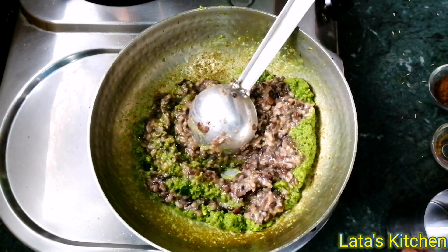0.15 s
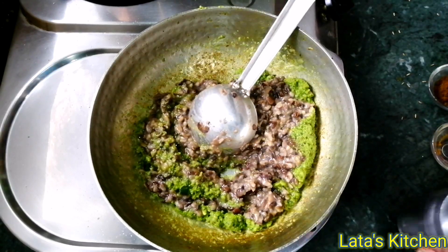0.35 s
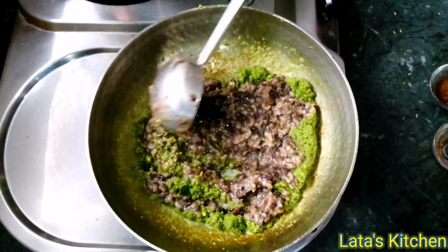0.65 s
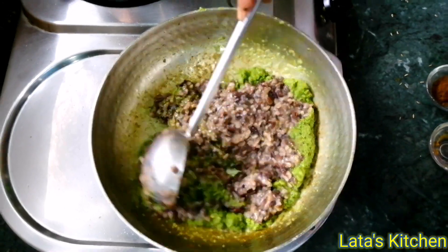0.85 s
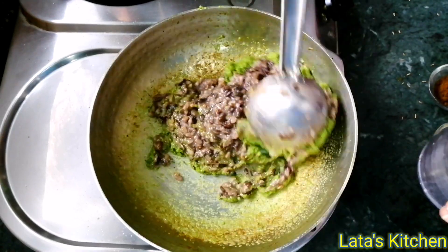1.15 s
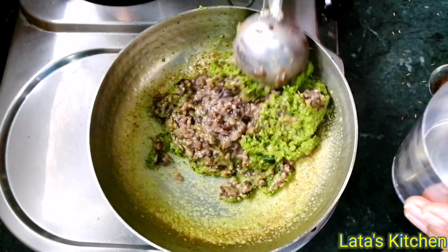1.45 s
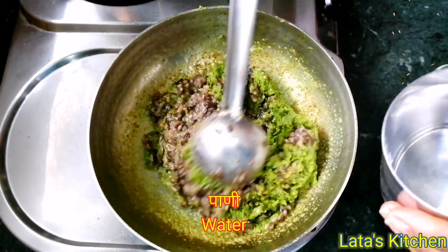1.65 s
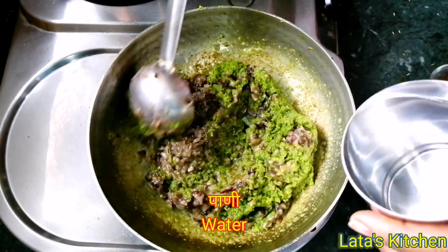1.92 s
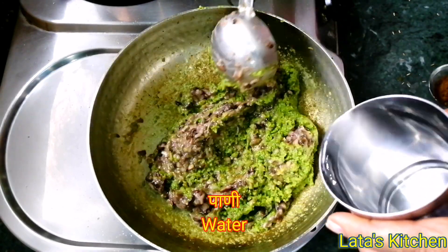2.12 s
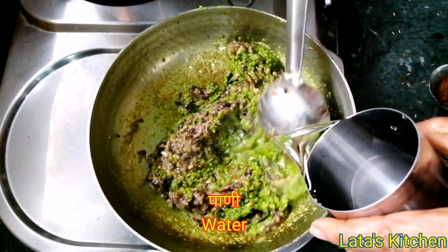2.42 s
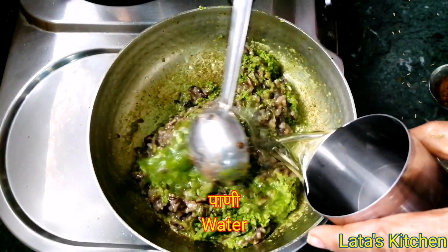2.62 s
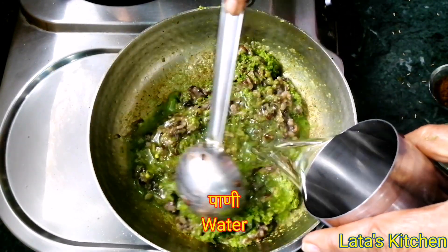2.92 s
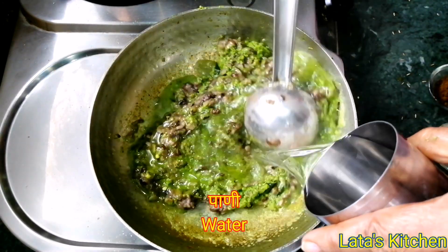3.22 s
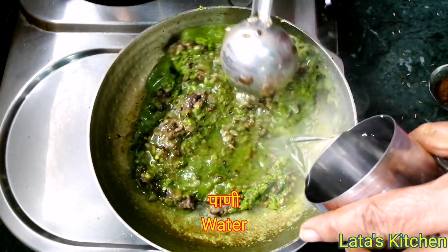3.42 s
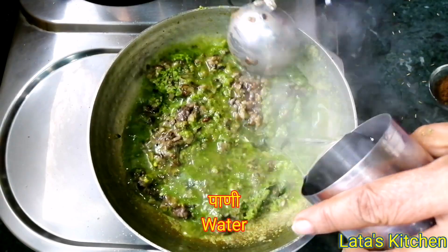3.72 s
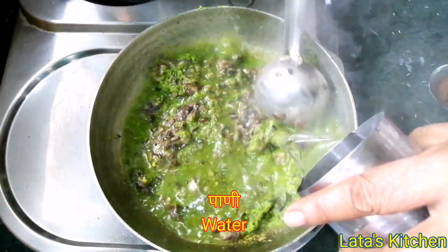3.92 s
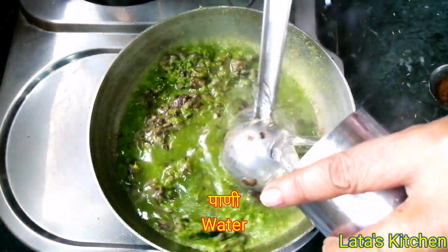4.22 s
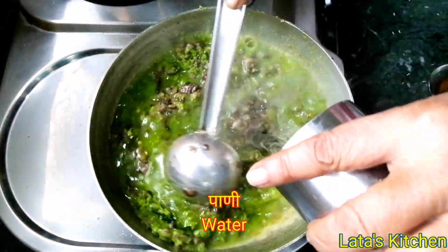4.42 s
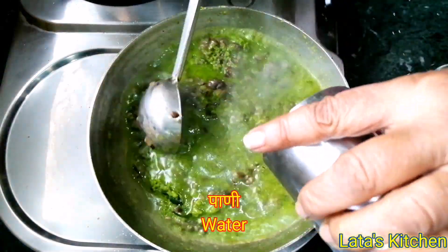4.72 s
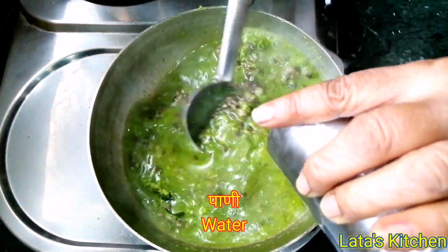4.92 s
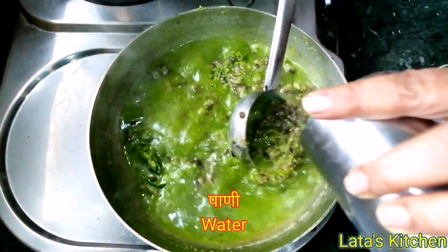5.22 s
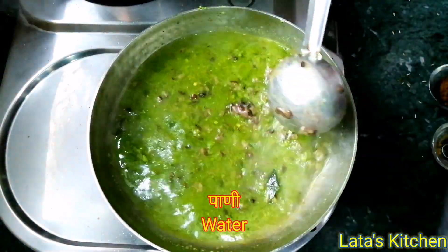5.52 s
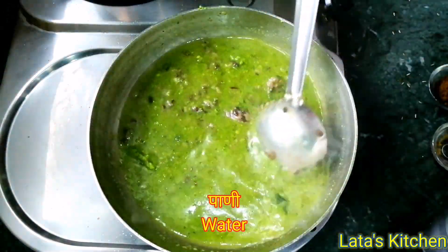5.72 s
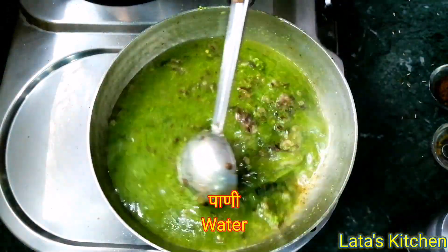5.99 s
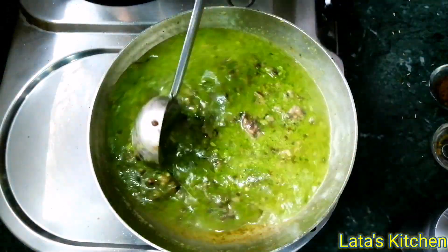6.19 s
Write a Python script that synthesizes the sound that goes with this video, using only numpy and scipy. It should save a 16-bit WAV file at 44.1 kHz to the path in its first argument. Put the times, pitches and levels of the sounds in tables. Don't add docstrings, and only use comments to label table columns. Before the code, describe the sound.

Stereo microphones close over the stove catch crisp, crackling sizzle already under way, thick with oil pops. The sizzle dips and flares as a ladle scrapes and thumps through the food and the pan rocks. Added water brings sharp swells of hiss, one brief bright clang on the rim, fluttering steam puffs, then softer bubbling surges with few pops. Low house and flame rumble stays underneath, the room small and fairly dry.

```python
import sys
import numpy as np
from scipy import signal
from scipy.fft import rfft, irfft
from scipy.io import wavfile

SR = 44100
rng = np.random.default_rng(int(sys.argv[2]) if len(sys.argv) > 2 else 0)


def store_pcm(level_fs):
    pcm = np.round(np.clip(level_fs, -1, 1) * 32767).astype(np.int16)
    wavfile.write(sys.argv[1], SR, np.atleast_2d(pcm).T)


def level_to_linear(level):
    exponent = np.asarray(level, float) / 20
    return 10 ** exponent


N = 280023

# t/s, throb level/dB, drone level/dB, drone f/Hz
HOUSE = [
    (0, -53, -53.5, 160),
    (.7, -55, -57, 164),
    (1.0, -53, -56.5, 140),
    (1.35, -52, -72, 137),
    (1.7, -63, -62, 145),
    (2.3, -51, -64, 140),
    (2.8, -67, -60.5, 146),
    (3.4, -68, -58.5, 138),
    (4.3, -57.5, -66.5, 145),
    (6.35, -56.5, -60.5, 141),
]
# f/Hz, level/dB per Hz
AIR_SPECTRUM = [(15, -3), (30, -21), (45, -31), (60, 4.5), (75, -7), (110, 2), (170, -7), (210, -13.5),
                (400, -27.5), (900, -8.5), (3000, -28.5)]
# t/s (full strength), level/dB, rise/(dB/s), hold/s, fall/(dB/s)
FLARES = [(0, -33, 50, 0.41, 27), (.46, -40.5, 30, 0.041, 57), (.8, -36, 32, 0.2, 21),
          (1.16, -25.5, 54, 0.055, 22.5), (1.56, -30, 30, 0.078, 28), (1.9, -37.5, 30, .1, 30),
          (2.07, -28.5, 72, 0.15, 17), (2.42, -31.5, 24, 0.12, 40), (2.635, -25, 255, 0.039, 20),
          (2.76, -26.5, 40, 0.047, 24), (2.95, -31, 11, 0.13, 40), (3.155, -23, 300, 0.042, 29),
          (3.3, -19.5, 69, 0.44, 39), (4.02, -32.5, 30, 0.14, 30), (4.28, -25, 39, .22, 36),
          (4.62, -34.5, 41, 0.23, 25), (5.22, -25.5, 126, 0.038, 45.5), (5.55, -38.5, 31, .13, 60),
          (5.95, -32.5, 168, 0.15, 27), (6.3, -30.5, 108, .1, 21)]
# t/s, brightness of bare metal/dB, standing water/(0 to 1)
PAN_FLOOR = [(0, 17, 0.5), (.5, 1.5, 0.36), (.9, 3, 0.6), (1.15, 2, 0.03), (1.43, 12, 0.08), (1.7, 6, 0.14),
             (2.15, 12.5, 0.29), (2.65, 4.5, 0.23), (3.15, 2.5, 0.24), (3.6, 3.5, 0.59), (4.0, -2.5, 1.0),
             (4.45, 8, 0.49), (4.7, 2, .8), (5.25, 1, .7), (5.55, 1, 0.33), (5.95, -4, 0.4),
             (6.15, 3, 0.54), (6.35, 2, 0.85)]
# t/s, level/dB against the fizz
CRACKLE = [
    (0, -7),
    (.6, -3.5),
    (.9, -10.5),
    (2.4, -3.5),
    (2.7, -16),
    (3.1, -13),
    (4, -24),
    (4.4, -30),
    (5.2, -29),
    (6.35, -20.5),
]
# t/s, level/dB against the fizz, length/s
PUFFS = [(3.153, -2, 0.012), (3.19, -15, 0.0075), (3.22, 1, 0.0095), (3.315, 1, 0.016), (4.256, 7, 0.0063),
         (4.285, -1, 0.011), (4.331, 9, .005), (4.357, 5.5, 0.0072), (4.381, 5, .006), (4.416, 5.5, .008),
         (4.451, 5.5, 0.018), (4.478, 5, 0.0096), (4.497, 6, 0.0053), (4.518, 5, .008), (6.237, 3, 0.0088)]
# f/Hz, level/dB per Hz
FIZZ_SPECTRUM = [(1500, -10), (2500, -1.5), (3500, 4.5), (5000, 4), (9000, -0.5), (12000, -2.5),
                 (16000, -10)]
BOIL_SPECTRUM = [(200, -36.5), (450, -9.5), (800, -3), (1200, -2.5), (1700, 3.5), (2500, -0.5),
                 (3500, -8.5), (6000, -58)]
# f/Hz, width/Hz, level/dB
BOWL_MODES = [(890, 123, 3.5), (1720, 53, 2)]
# t/s, peak level/dB, left over right/dB
SPITS = [(0.0302, -28, 2), (0.0761, -13, -15), (0.112, -7.5, -7), (0.129, -11, -4), (0.161, -15, -2.5),
         (0.1674, -16, -0.5), (0.1864, -21, 2.5), (0.1919, 2, -4), (0.2064, -20, 19), (0.2164, -14, 0.5),
         (0.2348, -11, -2), (0.2497, -7, -8), (0.2871, -12, -9), (0.305, -5, 11.5), (0.3515, -18, 3),
         (0.3994, -18, 1.0), (0.4208, -27, 1.5), (0.4214, -5.5, 2), (0.4503, -13, 1.0), (0.4574, -8, 5),
         (0.4814, -13, 1.0), (0.5042, -13, 3.5), (0.5164, -10, 5), (0.561, -8, 7), (0.7411, -9, 1),
         (0.935, -10, -8), (1.045, -13, -0.5), (1.1417, -16, -7), (1.9618, -10, -7), (2.0564, -4, -14)]
# t/s, hum level/dB, hold/s, fall/(dB/s)
ROCKS = [(.09, -58, .02, 90), (.28, -57, .02, 90), (0.487, -48.5, 0.07, 200), (.99, -49, .01, 200),
         (1.15, -46.5, 0.13, 200), (1.656, -52.5, 0.018, 72), (2.15, -58, .02, 66), (2.436, -53, .03, 60.5),
         (2.78, -57, .02, 102), (3.24, -45.5, .05, 60), (3.77, -40, 0.14, 225), (4.067, -46.5, 0.11, 90),
         (4.42, -41.5, .08, 60), (5.03, -56.5, 0.045, 25), (5.802, -47.5, 0.17, 220),
         (6.063, -45, 0.065, 122)]
# t/s, rumble level/dB
DRAGS = [(.48, -44), (.85, -49), (.99, -40.5), (1.11, -40), (1.66, -44.5), (2.41, -48), (3.2, -48),
         (3.48, -48), (3.74, -35), (3.9, -47), (4.1, -44.5), (4.45, -43.5), (5.8, -47), (5.99, -53)]
# t/s, peak level/dB, f/Hz, t60/s
KNOCKS = [(0.464, -46.5, 288, 0.042), (.464, -53, 523, 0.033), (.62, -63.5, 533, 0.56),
          (0.906, -49, 2010, 0.18), (.972, -33, 2150, 0.0075), (1.0, -53, 280, 0.087),
          (1.023, -38, 1680, 0.02), (1.024, -36, 755, 0.014), (1.141, -55, 300, .08),
          (1.652, -52, 280, .07), (3.828, -22, 1360, 0.0076), (3.833, -29, 1250, 0.0065),
          (3.838, -18, 1310, 0.0096)]
# t/s, strength level/dB
RIM_SKIPS = [
    (3.6952, -13),
    (3.6985, -10),
    (3.7092, -3),
    (3.7128, -6),
    (3.7148, -5),
    (3.7178, -5),
    (3.7235, -6),
    (3.7265, -8),
    (3.733, -11),
]
LADLE_HZ = [1751, 2257, 2925, 4420, 5217, 6113, 7075, 7084, 7644, 8120, 9214, 9605, 10018, 10405, 10468,
            11620, 12388, 12975, 13193, 14100, 15078]
# left level/dB, right level/dB, swell/s, t60/s
LADLE_MODES = [(-12.5, -17.5, .035, .35), (-28, -28, .003, .12), (-38, -38, .01, .2), (-41, -38, .005, .2),
               (-22, -18, .02, .45), (-32, -35, .01, .5), (-33, -22, .008, .7), (-36, -31, .01, .7),
               (-31, -35, .005, .4), (-40, -42, .005, .5), (-20, -21, .004, .2), (-29, -28, .01, .3),
               (-27, -29, .01, .3), (-22, -29, .015, .3), (-26, -28, .01, .3), (-34, -26, .005, .3),
               (-22, -22, .008, .3), (-31, -25, .01, .35), (-26, -24, .005, .25), (-33, -23, .006, .25),
               (-39, -34, .03, .3)]
# f/Hz, width/Hz, level/dB
PORTS = [
    [(7895, 3150, 16.5)],
    [(6114, 1530, 12.5), (8060, 4000, 2.5), (15030, 1260, 12.5)],
]


def rms_one(x):
    return x / np.sqrt(np.mean(x ** 2) + 1e-20)


def in_time(rows):
    s, *columns = np.transpose(rows)
    return [np.interp(np.arange(N) / SR, s, column) for column in columns]


def sides(pan_db):
    return level_to_linear(np.array([pan_db / 2, -pan_db / 2]))


def band(x, low_hz, high_hz):
    return signal.sosfilt(signal.butter(2, [low_hz, high_hz], "band", fs=SR, output="sos"), x)


def colour(x, points, size=8192):
    hz, db = np.transpose(points)
    bins_hz = np.arange(size // 2 + 1) * SR / size + 1
    cepstrum = irfft(np.log(level_to_linear(np.interp(np.log(bins_hz), np.log(hz), db))))
    cepstrum[1:size // 2] *= 2
    cepstrum[size // 2 + 1:] = 0
    response = irfft(np.exp(rfft(cepstrum)))
    return signal.oaconvolve(np.atleast_2d(x), response[None], axes=1)[:, :N]


def peaks(x, rows):
    for hz, width_hz, db in rows:
        g, w, half = level_to_linear(db / 2), 2 * np.pi * hz / SR, np.pi * width_hz / SR
        middle = -2 * np.cos(w)
        x = signal.lfilter([1 + half * g, middle, 1 - half * g], [1 + half / g, middle, 1 - half / g], x)
    return x


def drift(rate_hz):
    r = np.exp(-80 * np.pi * rate_hz / SR)
    slow = signal.lfilter([1], [1, -2 * r, r * r], rng.standard_normal(N // 40 + 2002))[2000:]
    return np.interp(np.arange(N) / 40, np.arange(len(slow)), rms_one(slow))


def swells(rows, rest_db):
    t = np.arange(0, N + 64, 64) / SR
    power = level_to_linear(2 * rest_db)
    for s, db, rise, hold, fall in rows:
        rising_db = rise * np.maximum(s - t, 0)
        falling_db = max(fall, 16) * np.maximum(t - s - hold, 0)
        power = power + level_to_linear(2 * (db - rising_db - falling_db))
    return np.interp(np.arange(N) / SR, t, 10 * np.log10(power))


def bursts(per_s, spread_db, patchy_db, count=10):
    wall_db, wall_fall_db, size = -2, .12, 256
    out, together = np.zeros((2, N)), drift(27)
    for spot in range(count):
        born = rng.random(N) < per_s / count / SR
        sizes = level_to_linear(spread_db * np.minimum(rng.exponential(1, N), 4)) * rng.choice([-1, 1], N)
        flicker = level_to_linear(patchy_db * (0.33 * together + drift(18.6)))
        walls = level_to_linear(wall_db - wall_fall_db * np.arange(size)) * rng.standard_normal((2, size))
        walls *= rng.random((2, size)) < .08
        walls[:, :14] = 0
        paths = signal.lfilter([.7, -.7], [1, -.7], walls)
        paths[0, 2] = paths[1, 2 + spot] = 1
        out += signal.oaconvolve((born * sizes * flicker)[None], paths, axes=1)[:, :N]
    return out


def air():
    deep_db, drone_db, drone_hz = in_time(HOUSE)
    noise = rng.standard_normal(N) + 0.27 * rng.standard_normal((2, N))
    deep = band(noise, 26, 40)
    drone_phase = 2 * np.pi * np.cumsum(drone_hz + 8 * drift(6)) / SR
    drone = np.sqrt(2) * (1 + 0.51 * drift(10.7)) * np.sin(drone_phase)
    rumble = level_to_linear(-51.5) * rms_one(colour(noise, AIR_SPECTRUM))
    return rumble + level_to_linear(deep_db + 1) * rms_one(deep) + level_to_linear(drone_db) * drone


def steam_puffs():
    t = np.arange(N) / SR
    envelope = sum(level_to_linear(db + 0.5) * np.exp(-((t - s) / length) ** 2) for s, db, length in PUFFS)
    return envelope * band(rng.standard_normal((2, N)), 6100, 9200)


def fizz(level_db, bright_db):
    dense = rms_one(bursts(8000, spread_db=2.5, patchy_db=2.2))
    lone = rms_one(band(bursts(260, spread_db=2.5, patchy_db=12.5), 5000, 15000))
    pops = level_to_linear(in_time(CRACKLE)[0] - 3.5) * lone
    whole = rms_one(colour(dense + pops + steam_puffs(), FIZZ_SPECTRUM))
    hiss = rms_one(colour(rng.standard_normal((2, N)), FIZZ_SPECTRUM))
    high = signal.butter(1, 9500, "high", fs=SR, output="sos")
    top, fine = signal.sosfilt(high, whole), signal.sosfilt(high, hiss)
    return level_to_linear(level_db - 8.0) * (whole - top + level_to_linear(bright_db) * (1.075 * top + 0.83 * fine))


def boil(level_db):
    pockets = bursts(2500, spread_db=1.0, patchy_db=2.0)
    return level_to_linear(level_db) * rms_one(peaks(colour(pockets, BOIL_SPECTRUM), BOWL_MODES))


def spits():
    echo_db, top_db, size = -12, -0.5, 300
    big_db, dull_per_db = -9.5, 9
    out, rows = np.zeros((2, N)), np.array(SPITS)
    shape = (len(rows), 2, size)
    scatter = rng.standard_normal(shape) * (rng.random(shape) < .09)
    for (s, peak_db, pan_db), walls in zip(rows, scatter):
        dull_db = dull_per_db * max(peak_db - big_db, 0)
        shot = walls * level_to_linear(-5.0 - 0.14 * np.arange(size))
        shot[:, 0] = 1
        shot[1, 26] = level_to_linear(echo_db - dull_db)
        sound = band(shot, 5700, 9700) + level_to_linear(top_db - dull_db) * band(shot, 10000, 19000)
        at = round((s + .0015) * SR)
        out[:, at:at + size] += level_to_linear(peak_db) * sides(pan_db)[:, None] * sound
    return out


def stove():
    rocks = [(s, db, 250, hold, fall) for s, db, hold, fall in ROCKS]
    drags = [(s, db, 200, 0.014, 124) for s, db in DRAGS]
    sheet_db, drag_db = swells(rocks, rest_db=-83), swells(drags, rest_db=-55.5)
    sheet_hz = 94.5 + 1.21 * drift(1.6)
    sheet = np.sqrt(2) * level_to_linear(sheet_db) * np.sin(2 * np.pi * np.cumsum(sheet_hz) / SR)
    same, own = rng.standard_normal(N), rng.standard_normal((2, N))
    drag = band(same + .5 * own, 170, 480)
    return sheet + level_to_linear(drag_db - 9.0) * rms_one(drag)


def knocks():
    out, t = np.zeros(N), np.arange(8000) / SR
    for s, peak_db, hz, t60 in KNOCKS:
        envelope = level_to_linear(peak_db + 9.0 - 60 * t / t60) * (1 - np.exp(-t * 2500))
        at = round(s * SR)
        out[at:at + 8000] += envelope * np.sin(2 * np.pi * hz * t)
    return out


def skid():
    rows, hits = np.array(RIM_SKIPS), np.zeros(N)
    hits[(rows[:, 0] * SR).astype(int)] = level_to_linear(rows[:, 1] - 7.5)
    envelope = signal.lfilter([1], [1, -level_to_linear(-60 / (.014 * SR))], hits)
    return envelope * band(rng.standard_normal((2, N)), 2500, 10500)


def clang():
    strike_s = 3.697
    t = np.clip(np.arange(N) / SR - strike_s, 0, 1)
    out, phases = np.zeros((2, N)), rng.uniform(0, 2 * np.pi, len(LADLE_MODES))
    for hz, (left_db, right_db, swell, t60), phase in zip(LADLE_HZ, LADLE_MODES, phases):
        shape = (1 - np.exp(-t / swell)) ** 2 * level_to_linear(5 - 60 * t / t60)
        shape *= level_to_linear(-12 * np.clip((t - .08) / .012, 0, 1) * (hz < 2000))
        gains = level_to_linear(np.array([[left_db], [right_db]]))
        out += gains * shape * np.sin(2 * np.pi * hz * t + phase + [[0], [1]])
    return out * level_to_linear(-60 * np.clip(t - .085, 0, 1)) * (t < 1)


def kitchen(x):
    t60_s, level_db = .25, -12
    t = np.arange(round(.4 * SR)) / SR
    tail = rng.standard_normal((2, len(t))) * level_to_linear(-60 * t / t60_s) * (t > .004)
    tail /= np.sqrt(np.sum(tail ** 2, axis=1, keepdims=True))
    return level_to_linear(level_db) * signal.oaconvolve(x, tail, axes=1)[:, :N]


def scene():
    sizzle_db = swells(FLARES, rest_db=-64)
    bright_db, water = in_time(PAN_FLOOR)
    fizz_db = sizzle_db + 3.5 - 0.81 * bright_db
    boil_db = -48 + 9.5 * water + (sizzle_db + 30)
    frying = sides(-2.35)[:, None] * fizz(fizz_db, bright_db) + boil(boil_db)
    pan = frying + spits() + knocks() + skid()
    return air() + pan + kitchen(pan) + stove() + clang()


def low_pass(x):
    return signal.sosfilt(signal.butter(12, 16260, fs=SR, output="sos"), x)


def record(dry):
    heard = np.array([peaks(x, port) for x, port in zip(dry, PORTS)])
    cut = signal.sosfilt(signal.ellip(10, .5, 60, 15440, fs=SR, output="sos"), heard)
    return low_pass(np.clip(cut, -1, 1))


dry = scene()
out = record(dry)
store_pcm(out)
```